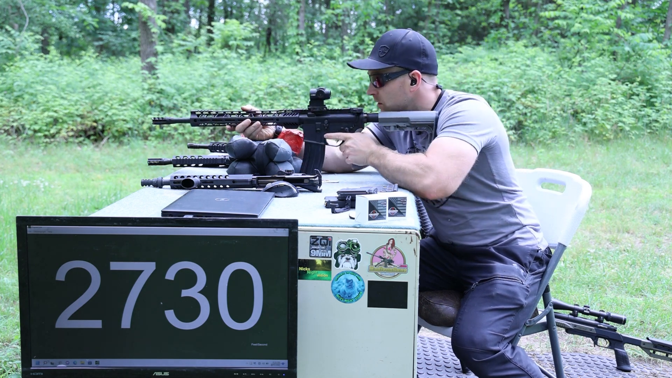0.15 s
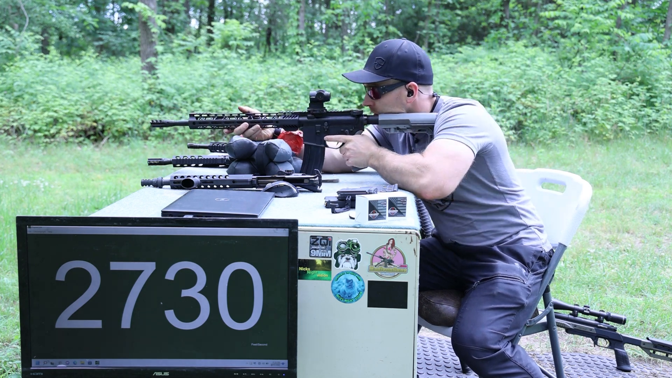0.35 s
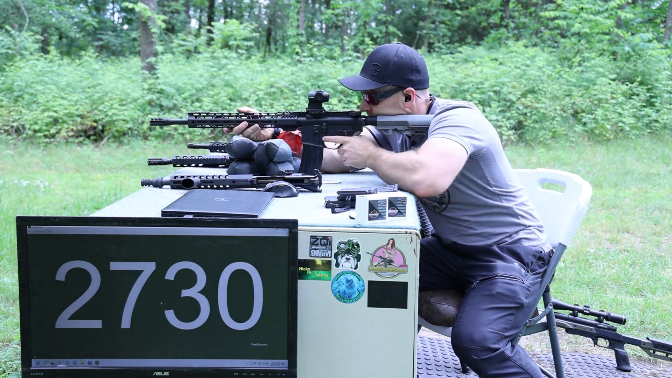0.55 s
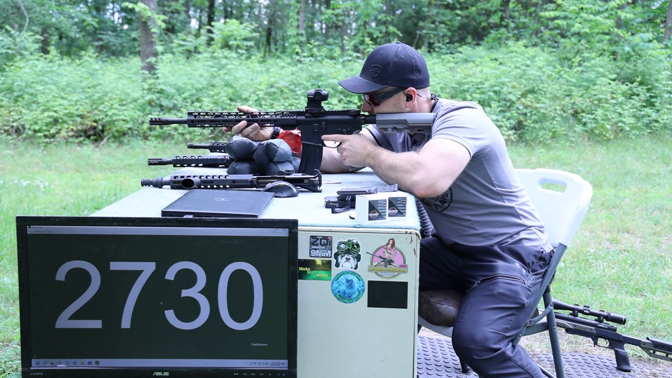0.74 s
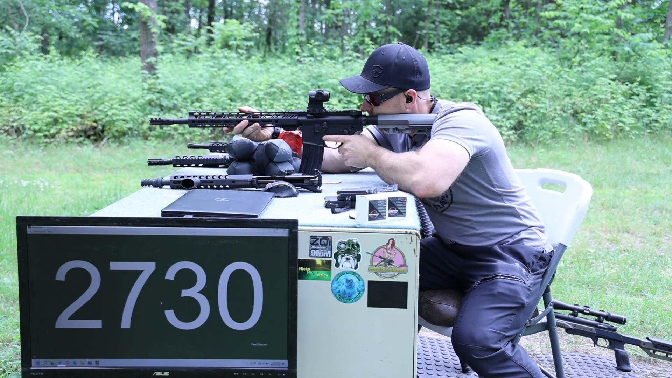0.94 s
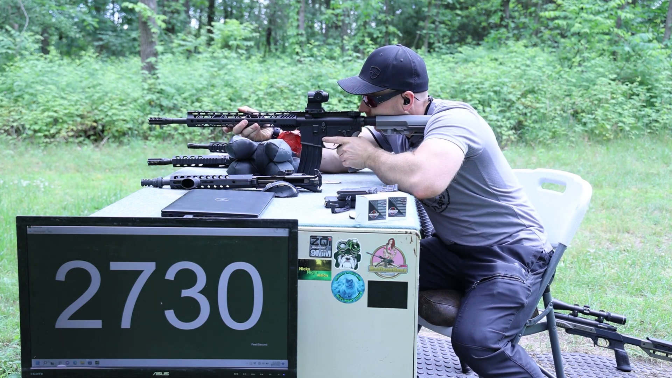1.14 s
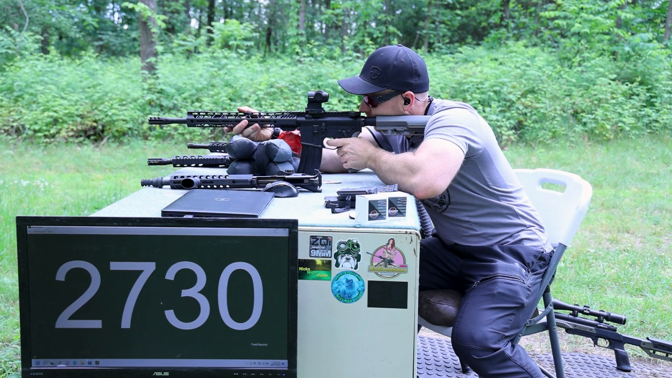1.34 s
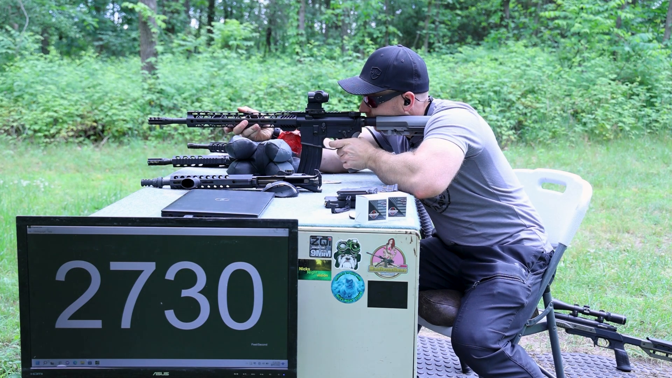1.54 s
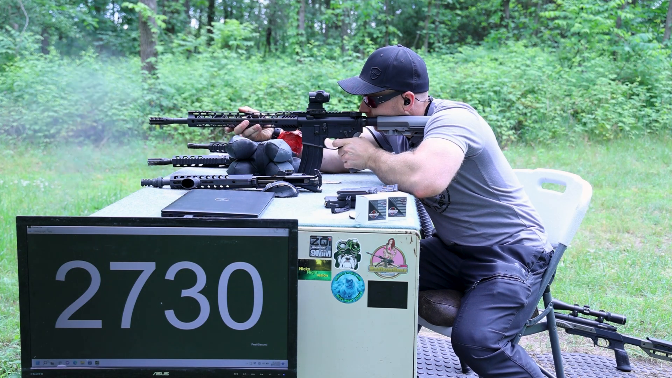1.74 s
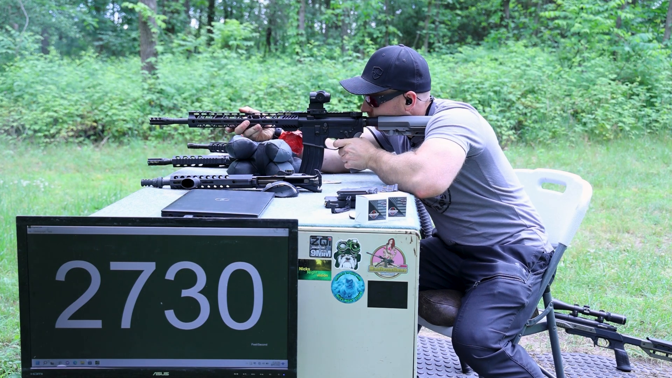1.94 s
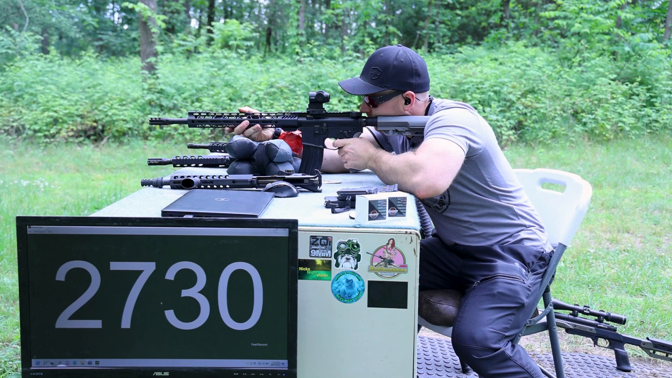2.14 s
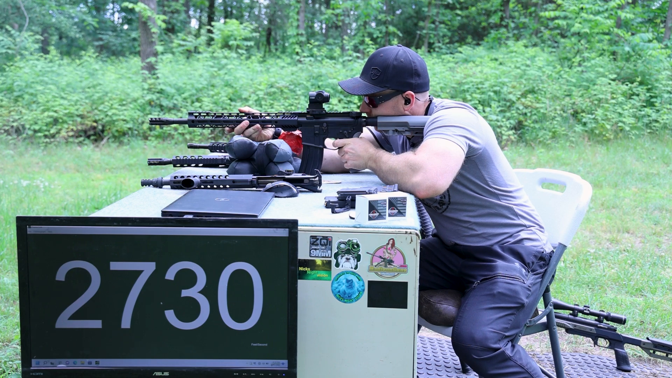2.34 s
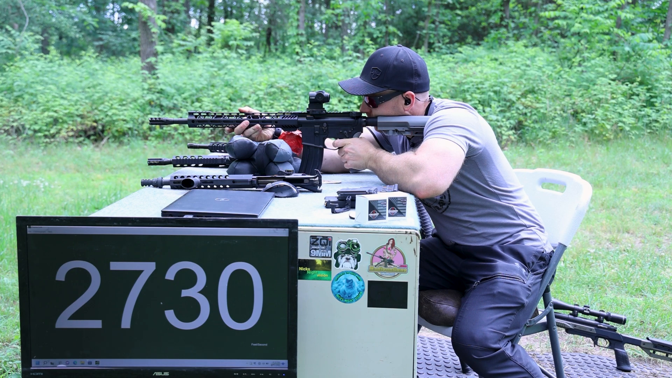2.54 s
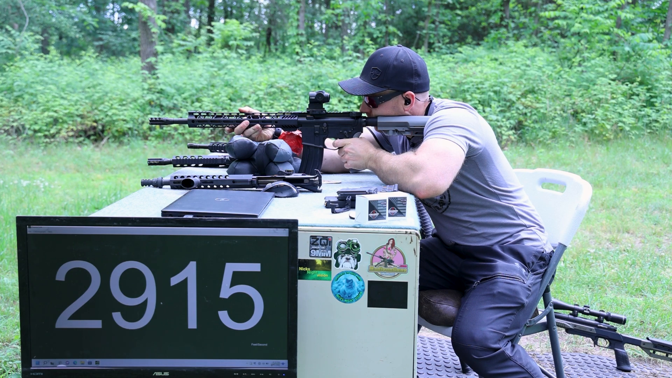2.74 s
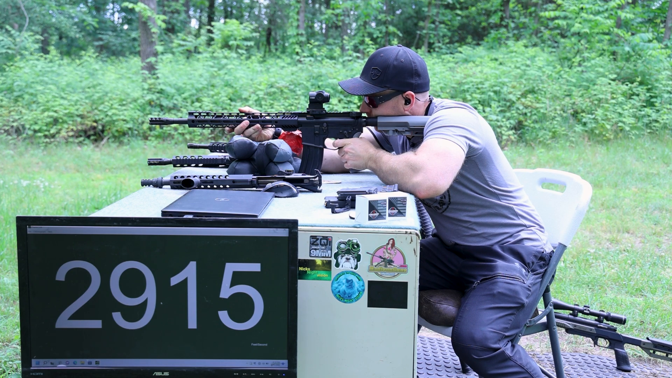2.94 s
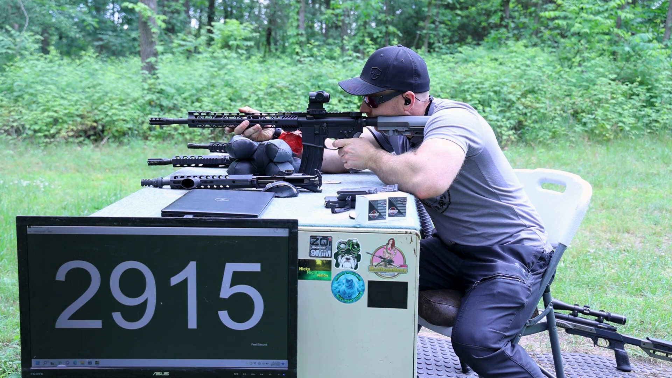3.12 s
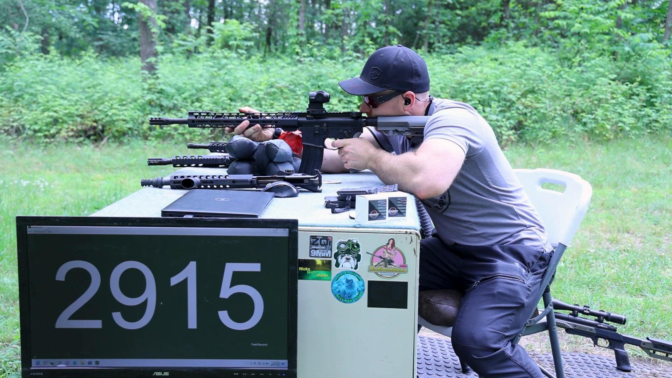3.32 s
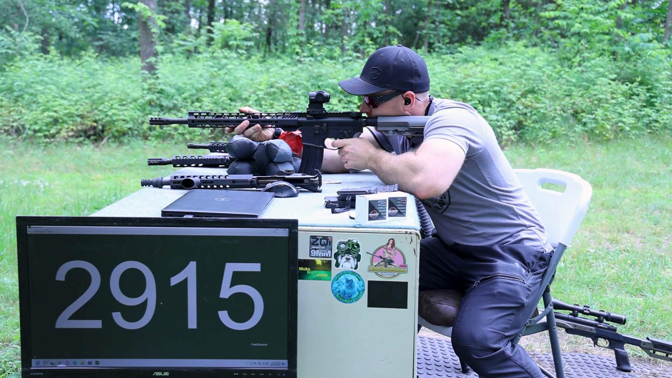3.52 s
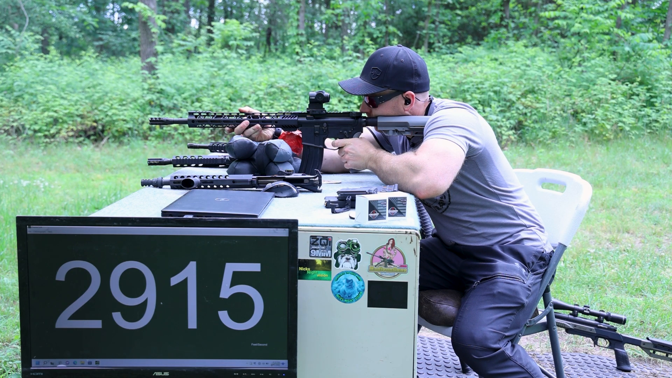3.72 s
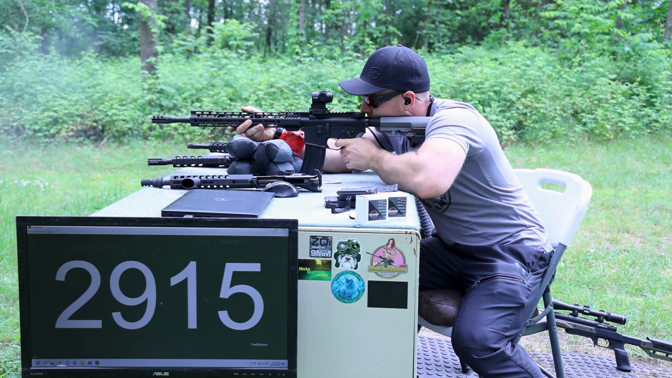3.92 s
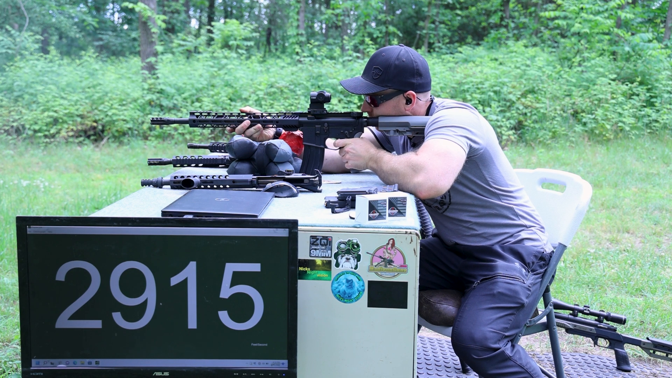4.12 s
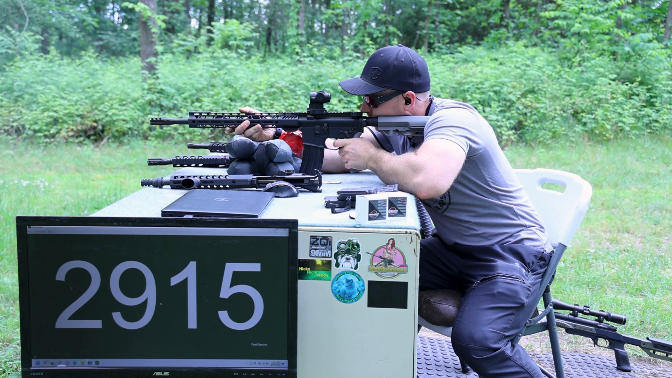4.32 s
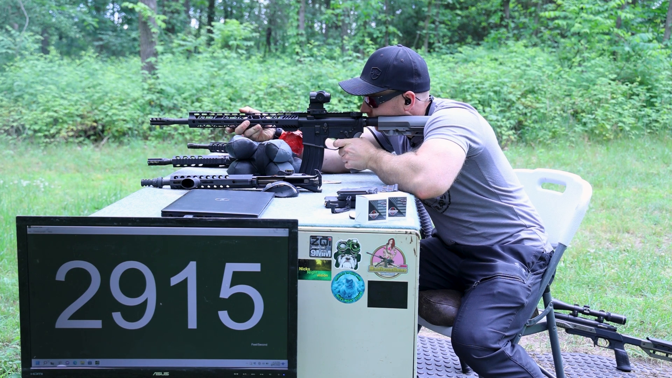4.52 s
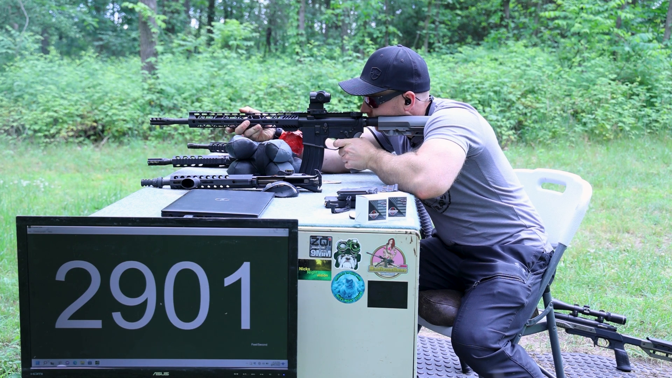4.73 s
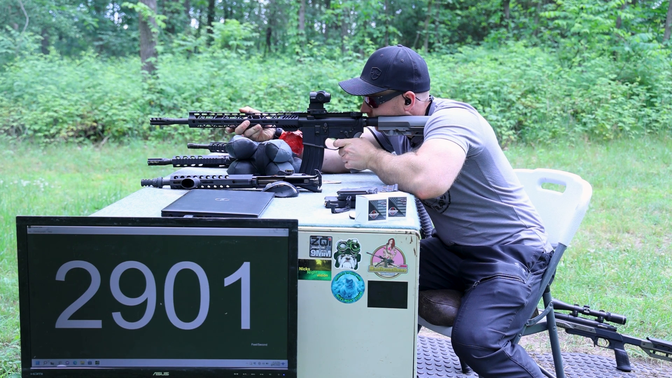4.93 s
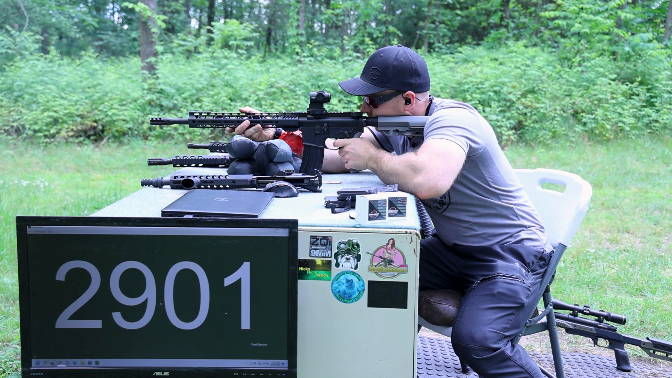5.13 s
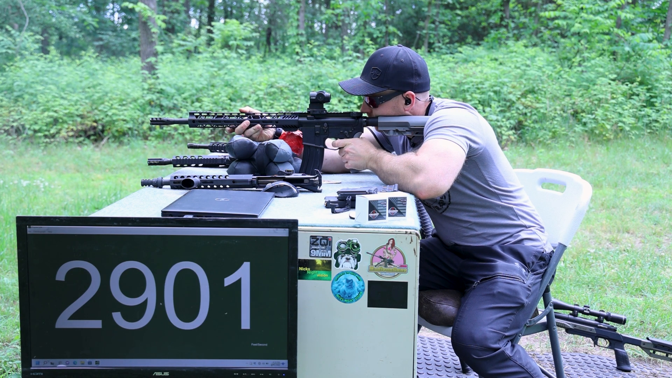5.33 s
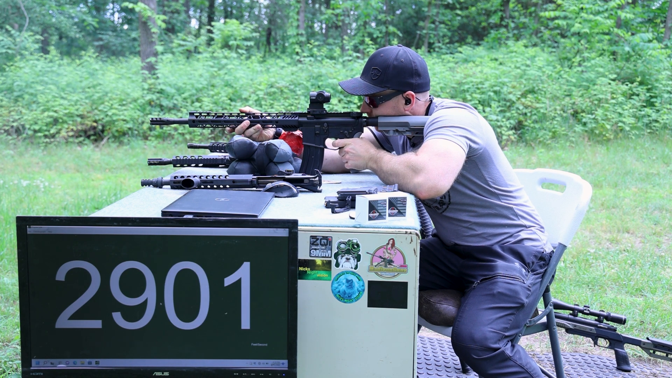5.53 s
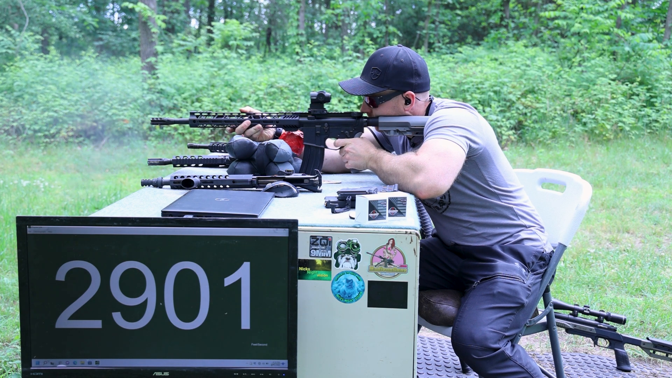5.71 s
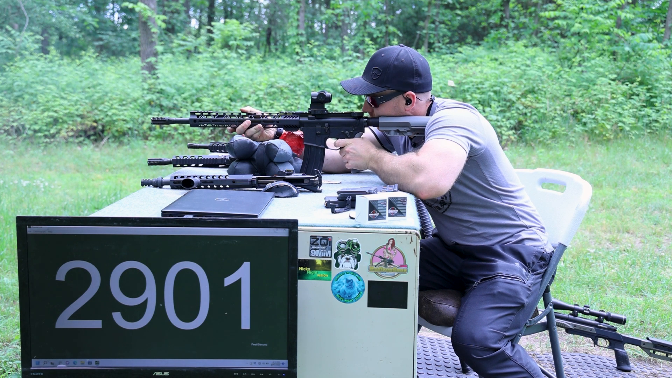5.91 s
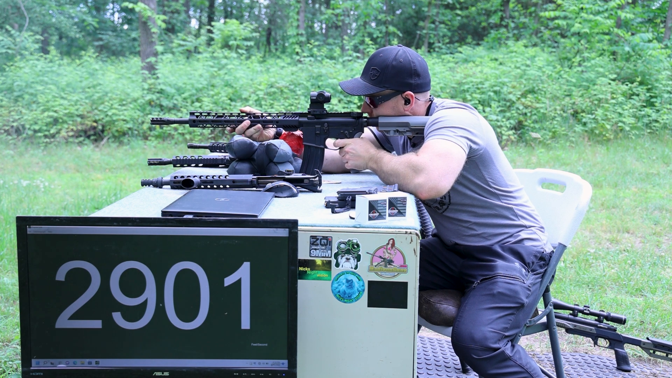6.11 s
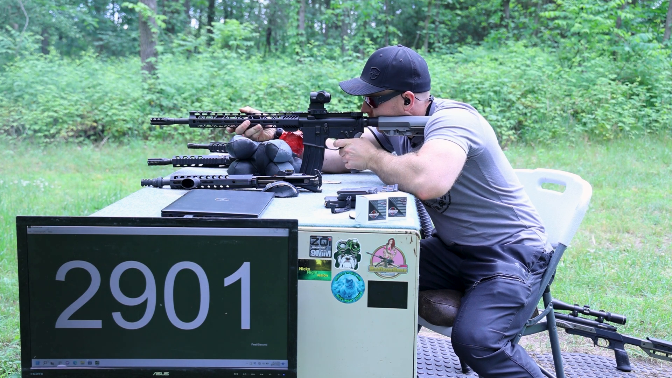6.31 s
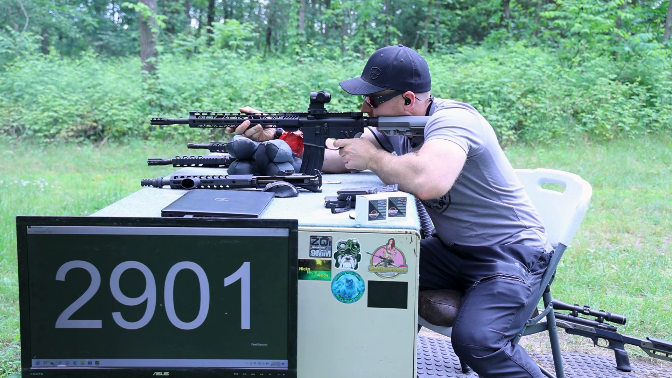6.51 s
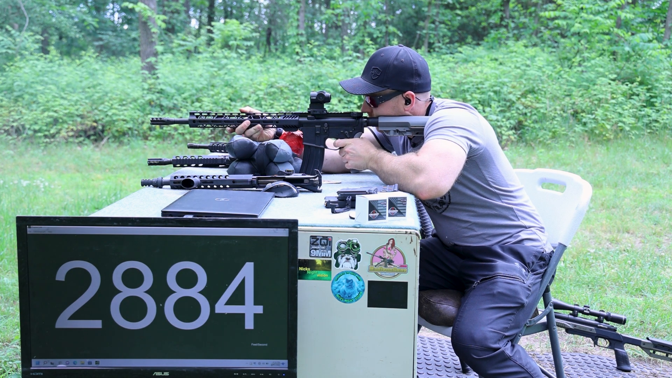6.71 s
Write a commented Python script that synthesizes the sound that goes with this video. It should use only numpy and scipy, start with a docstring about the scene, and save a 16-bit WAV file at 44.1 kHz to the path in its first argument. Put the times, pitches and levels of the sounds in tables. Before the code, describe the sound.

Soft knocks and cloth rustle as a rifle is settled on a rest, then three loud shots, each with a long forest echo.

```python
"""Faint outdoor air, cloth rustle and soft knocks are heard first, as a rifle is settled on its bench rest.
Three shots follow: shaped noise for blast and gas, steel blows of the action, a thin ring of the case.
One long, darkening forest echo, built from scattered noise and distinct returns, repeats with each blast.
Between the shots the trigger resets with a sharp click of steel noise and decaying sine tones.
The input stage flattens the peaks of the blasts."""
import sys
import numpy as np
from scipy import signal
from scipy.fft import irfft
from scipy.io import wavfile
from scipy.ndimage import map_coordinates

SR = 44100
rng = np.random.default_rng(int(sys.argv[2]) if len(sys.argv) > 2 else 0)


def output_pcm(signal):
    """Save a mono or channel-first signal as 16-bit PCM at the path in sys.argv[1].

    Samples are clipped to [-1, 1] before scaling.
    """
    pcm = np.clip(np.atleast_2d(signal).T, -1, 1) * 32767
    wavfile.write(sys.argv[1], SR, np.round(pcm).astype(np.int16))


N = 302526  # samples

# Colour tables hold spectrum points: freq_hz, density_db (per Hz); noise() sets the rms to 1.


def amp(db):
    """Amplitude factor of a level in dB."""
    return 10 ** (np.asarray(db) / 20)


def unit(x):
    """Scale to rms 1."""
    return x / np.sqrt(np.mean(x ** 2) + 1e-20)


def along(points, hz):
    """Interpolate (freq_hz, value) points on a log frequency axis."""
    f, v = np.transpose(points)
    return np.interp(np.log(hz + 1), np.log(f + 1), v)


def clock(size):
    """Seconds at each sample."""
    return np.arange(size) / SR


def noise(colour, size, low_hz=18):
    """Random-phase noise of rms 1 with a given spectrum, falling away below low_hz."""
    hz = np.fft.rfftfreq(size, 1 / SR)
    gain = amp(along(colour, hz)) * hz / np.hypot(hz, low_hz)
    phase = np.exp(2j * np.pi * rng.random(len(hz)))
    return unit(irfft(gain * phase, size))


def wobble(rate_hz, size):
    """Smooth random curve with rate_hz knots a second."""
    return map_coordinates(rng.standard_normal(size), [clock(size) * rate_hz], mode="mirror")


def strike(t, rise_s, t60_s):
    """Envelope that swells quickly and dies exponentially."""
    t = np.maximum(t, 0)
    rise = 1 - np.exp(-(t / rise_s) ** 2)
    return rise * np.exp(-np.log(1000) * t / t60_s)


def swell(t, centre_s, width_s):
    """Bell-shaped envelope; width_s is its standard deviation."""
    return np.exp(-.5 * ((t - centre_s) / width_s) ** 2)


def add(track, start_s, sound):
    """Mix a sound into the track, cut at the track's end."""
    part = track[max(round(start_s * SR), 0):][:len(sound)]
    part += sound[:len(part)]


# outdoor air colour: freq_hz, density_db
AIR_COLOUR = [(20, -11), (60, -3.5), (110, 2.5), (220, -3), (450, -5.5), (800, -19), (1400, -26),
              (3000, -34.5), (15000, -37)]


def clearing():
    """Faint, low outdoor air: noise with a slowly wandering level."""
    return amp(-74.5) * noise(AIR_COLOUR, N) * amp(0.72 * wobble(3, N))


# sleeve strokes along the stock: centre_s, level_db, width_s
STROKES = [(0.42, -59.5, .028), (0.745, -54, 0.028), (1.04, -68, .022)]
# bright cloth colour, also the edge of the knocks: freq_hz, density_db
CLOTH_COLOUR = [(470, -60), (800, -28), (896, -8), (1030, -9), (1480, -2), (2290, -11), (7170, -7.5),
                (16000, -11)]
# dull body-shuffle colour: freq_hz, density_db
SHUFFLE_COLOUR = [(150, -28), (250, 1), (318, -6), (580, -4), (707, -8.5), (1080, -4.5), (2340, -20.5),
                  (3000, -17), (3900, -35), (6600, -120)]
SETTLED_S, SETTLE_DB_PER_S = 1.24, 170  # the shifting dies away from here
RUSTLE_DB, SHUFFLE_DB = -76, -68.5
STROKE_SHUFFLE_DB = -22  # the body's dull share of a stroke


def settling():
    """Cloth rustles and slides over the stock in a few strokes until the shooter holds still."""
    t = clock(N)
    shifting = amp(-SETTLE_DB_PER_S * np.maximum(t - SETTLED_S, 0))
    strokes = sum(amp(level_db) * swell(t, centre_s, width_s) for centre_s, level_db, width_s in STROKES)

    rustle = amp(RUSTLE_DB + 1.2 * wobble(25.4, N)) * shifting
    swish = (rustle + strokes) * noise(CLOTH_COLOUR, N) * amp(1.2 * wobble(130.7, N))

    shuffle_env = amp(SHUFFLE_DB) * shifting + amp(STROKE_SHUFFLE_DB) * strokes
    shuffle = shuffle_env * noise(SHUFFLE_COLOUR, N) * amp(1.7 * wobble(20.5, N))

    # the stock presses softly into the shoulder just before the first shot
    press_colour = [(60, -4), (400, -4), (950, -4), (1400, -17), (3000, -32), (12000, -51)]
    press = amp(-54) * noise(press_colour, N) * swell(t, 1.583, 0.012)
    return swish + shuffle + press


# rifle knocks on the rest: start_s, level_db (before +1 dB), treble_db (before +5.5 dB), t60_s
KNOCKS = [(0.0793, -43.5, -13.5, 0.038), (0.238, -57, -24, .035), (0.392, -41.5, -22, 0.039),
          (0.5, -43, -26, 0.038), (0.575, -57, -8, .04), (0.812, -55.5, -22, 0.044),
          (0.963, -50.5, -18, 0.047), (1.018, -48.5, -19, .04), (1.041, -43, -26, 0.039),
          (1.103, -40.5, -27, 0.033), (1.195, -55.5, -10, .03), (1.285, -55.5, -8, 0.033)]
# knock body colour: freq_hz, density_db
REST_COLOUR = [(59, -27), (100, -1), (320, -13.5), (615, 1.5), (799, -3), (1150, -3.5), (1810, -20),
               (2820, -25), (3380, -26), (4460, -32), (5000, -34), (6500, -56), (11000, -120)]
# mean tones a bump draws from rifle and bench: pitch_hz, level_db, t60_s
BENCH_TONES = [(592, 0.5, 0.25), (780, -9, 0.17), (910, 6, 0.2), (1150, -2.5, 0.26), (1280, -6, 0.19),
               (1615, -16, .2), (2370, -21, .05)]
CONTACT_S = 0.0011  # rise of knock body and edge


def knocks():
    """The rifle bumps on its rest, at another spot each time; tones of bench and rifle ring briefly."""
    out, t = np.zeros(N), clock(SR // 2)
    for start_s, level_db, treble_db, t60_s in KNOCKS:
        body_env = strike(t, CONTACT_S, t60_s) + amp(-21) * strike(t, 0.0071, 0.3)
        body = noise(REST_COLOUR, len(t)) * body_env
        ring = np.zeros(len(t))
        for pitch_hz, tone_db, tone_t60_s in BENCH_TONES:
            # the spot struck varies level and pitch
            gain = amp(tone_db + rng.normal(0, 5.9))
            tone = np.sin(2 * np.pi * pitch_hz * rng.normal(1, 0.0232) * t)
            ring += gain * tone * strike(t, 0.0027, tone_t60_s)
        edge = amp(treble_db + 5.5) * noise(CLOTH_COLOUR, len(t)) * strike(t, CONTACT_S, 0.019)
        add(out, start_s, amp(level_db + 1) * (body + edge + amp(-19) * ring))
    return out


# clothing and gear ticks: start_s, level_db (before -4.5 dB)
TICKS = [(0.2384, -44), (0.61, -42), (0.624, -45), (0.635, -41), (1.0819, -47), (1.1009, -43), (1.37, -56),
         (1.4044, -50), (1.5633, -54)]


def ticks():
    """Clothing and gear give tiny bright ticks: very short noise bursts."""
    out, t = np.zeros(N), clock(SR // 2)
    colour = [(1500, -2), (5000, 3), (15000, 12.0)]
    for start_s, level_db in TICKS:
        tick = noise(colour, len(t)) * strike(t, 0.00022, 0.0075)
        add(out, start_s, amp(level_db - 4.5) * tick)
    return out


# muzzle blast colour: freq_hz, density_db
BLAST_COLOUR = [(30, -20.5), (120, -7), (300, -10.5), (480, 4), (750, -3), (1200, -6), (2000, -13.5),
                (4000, -32), (15000, -49)]
# gas puff colour: freq_hz, density_db
THUMP_COLOUR = [(20, -15), (60, -7.5), (130, -5.5), (260, 0), (380, -5.5), (700, -46)]


def muzzle(swing_hz=34):
    """The blast rattles between ground and bench; the expanding gas adds a low thump."""
    t = clock(SR // 2)
    blast_env = amp(6.0) * swell(t, 0.014, .0047) + amp(-6) * strike(t, 0.0014, 0.12)
    blast = noise(BLAST_COLOUR, len(t)) * blast_env
    crack_colour = [(300, -5), (1500, -0.5), (5000, -5.5), (15000, -16)]
    crack = amp(-14.5) * noise(crack_colour, len(t)) * strike(t, 0.00047, 0.009)
    # a turbulent low puff starts first and lasts longest; a quick push and slow low swing centre near 30 ms
    push = unit(np.gradient(swell(t, 0.029, 0.0014)))
    swing = np.cos(2 * np.pi * swing_hz * (t - .03)) * swell(t, 0.031, .021)
    puff = noise(THUMP_COLOUR, len(t)) * strike(t - .006, 0.0032, 0.23)
    return blast + crack - amp(-31.0) * push + amp(-19.5) * swing + amp(-7.5) * puff


# scattered echo colour at its start: freq_hz, density_db
FOREST_COLOUR = [(30, -51), (85, -21), (170, -12.5), (290, -10), (380, -3), (433, 3), (470, -1.5),
                 (510, 1.5), (600, -2), (780, -4.5), (1130, -9.5), (1900, -14.5), (3500, -16.5),
                 (6700, -17), (15000, -22.5)]
# extra loss in leaves and air: freq_hz, loss_db_per_s (the magnitude is used)
PATH_LOSS = [(100, 5.5), (450, 9.5), (800, -0.5), (1200, 2.5), (1900, 10), (3500, 22.5), (6700, 45.5),
             (11000, 79.5), (15000, 117.5)]
# distinct returns from the forest edge: delay_s, level_db, width_s
SLAPS = [(0.071, -12.5, .01), (0.125, -17.5, 0.013), (0.227, -22, 0.025), (0.325, -23, 0.0038),
         (0.342, -17, 0.005), (0.521, -28, 0.0034), (0.624, -39.5, 0.0097)]
# distant-woods roll colour: freq_hz, density_db
HILLS_COLOUR = [(60, -23.5), (130, -7), (300, -9.5), (500, 2.5), (750, 0.5), (1100, -4), (1500, -14.5),
                (2500, -30.5), (5000, -59)]


def forest(spread_db=90, depth_s=0.45, patchy_db=1.06, surge_db=0.34, rise_s=.011):
    """Echo of one blast: countless trunks scatter it, the later from farther away, fainter and duller."""
    t = clock(N)
    hz, delay_s, spectrum = signal.stft(noise(FOREST_COLOUR, N), SR, nperseg=512)
    path_gain = amp(-np.abs(along(PATH_LOSS, hz))[:, None] * delay_s)
    tail = signal.istft(spectrum * path_gain, SR)[1][:N]
    spread_gain = amp(-spread_db * np.log10(1 + t / depth_s))
    tail = tail * spread_gain * (1 - np.exp(-(t / rise_s) ** 2))

    # leaves scatter the treble evenly; groups of trunks return the low part in surges
    trunks = signal.sosfiltfilt(signal.butter(2, 1500, fs=SR, output="sos"), tail)
    leaves = tail - trunks
    trunks_gain = amp(patchy_db * wobble(80, N) + surge_db * wobble(25, N))

    edge_colour = [(200, -28.0), (450, 11), (750, 8.5), (1300, -23.5), (4000, -33), (10000, -57.0)]
    slap_env = sum(amp(level_db) * swell(t, slap_s, width_s) for slap_s, level_db, width_s in SLAPS)
    slaps = slap_env * noise(edge_colour, N)

    # a bright hiss swells briefly about 0.19 s after each blast
    treble_hiss_colour = [(2000, -30.5), (7000, -3), (12000, 1), (16000, -7)]
    treble_hiss = amp(-35) * noise(treble_hiss_colour, N) * swell(t, .19, .024)

    # a dull roll comes back from the distant woods
    roll = amp(-41.5) * noise(HILLS_COLOUR, N) * strike(t, 0.99, 4.75) * amp(0.75 * wobble(41, N))
    return amp(-2.5) * leaves + amp(-1.06) * trunks * trunks_gain + slaps + treble_hiss + roll


# shots: start_s, level_db, case_ring_db (not scaled by level_db)
SHOTS = [(1.8273, -1.5, -48), (3.987, -1.5, -31.5), (5.8015, -1.5, -30)]
# steel blows of the action, added to the shot level: delay_s, level_db, t60_s
ACTION = [(-.0075, -22.5, 0.037), (0.0235, -16, .11), (0.059, -3.5, .06)]
# steel colour, also used by the resets: freq_hz, density_db
STEEL_COLOUR = [(200, -19.5), (1000, 7.5), (2500, 3.5), (4200, -2.5), (6200, 5), (9500, -8.5),
                (16000, -12.5)]


def shots():
    """Rifle and trees stay in place, so blast and echo repeat; the clatter of the action is new each time."""
    out, t = np.zeros(N), clock(SR // 2)
    report = forest()
    add(report, 0, muzzle())
    brass_colour = [(9000, -60.0), (11500, -17), (12300, -8.0), (12650, -1), (13000, -6.0), (15000, -24.0)]
    for start_s, level_db, case_ring_db in SHOTS:
        add(out, start_s, amp(level_db) * report)
        for delay_s, blow_db, t60_s in ACTION:
            blow = noise(STEEL_COLOUR, len(t)) * strike(t, 0.0002, t60_s)
            add(out, start_s + delay_s, amp(level_db + blow_db) * blow)
        # the ejected case rings thinly as it spins away
        brass = noise(brass_colour, len(t)) * swell(t, 0.1, 0.049)
        add(out, start_s, amp(case_ring_db) * brass)
    return out


# trigger resets: start_s, level_db, steel_db, ring_db (the last two relative to level_db)
RESETS = [(3.2822, -17, -1, -11), (5.2672, -14.5, -3, -14.5)]
# body colour of the first reset: freq_hz, density_db
FIRST_RESET_COLOUR = [(88, -48), (150, -20), (391, -4.5), (905, -11.5), (1190, -2), (1390, -20), (1720, -7),
                      (2360, -26), (3550, -20), (4160, -13.5), (5460, -25), (6770, -12), (7620, -28),
                      (14000, -29), (16000, -41)]
# body colour of the second reset: freq_hz, density_db
SECOND_RESET_COLOUR = [(88, -33), (150, -8), (1170, 1), (1340, 2), (1480, 0.5), (2020, 3), (2700, -34),
                       (4240, 4.5), (4580, -22), (6910, -12), (7920, -40), (8730, -9), (9630, -31),
                       (12200, -17), (16000, -32)]
# receiver and trigger-group tones: pitch_hz, level_db, t60_s
RECEIVER_TONES = [(950, -29, 0.24), (1098, 5, 0.046), (1074, -32.5, 1), (1180, -7, 0.025),
                  (1680, -11, 0.058), (2135, -3, 0.047), (2780, -29.5, 0.18), (4200, -13, 0.031),
                  (4400, -39, 0.29), (6300, -10, 0.021)]


def resets():
    """The disconnector lets go and the hammer snaps onto the sear; the receiver rings and the bench answers."""
    out, t = np.zeros(N), clock(SR // 2)
    snap_t, knock_t = t - .0022, t - .0033
    body_env = amp(-14.5) * strike(t, 0.0007, 0.025) + strike(knock_t, 0.00049, 0.023)
    answer_colour = [(200, -8), (950, 2.5), (1600, -15), (3000, -15), (7000, -21), (15000, -35)]
    body_colours = (FIRST_RESET_COLOUR, SECOND_RESET_COLOUR)
    for (start_s, level_db, steel_db, ring_db), body_colour in zip(RESETS, body_colours):
        steel = amp(steel_db) * noise(STEEL_COLOUR, len(t)) * strike(snap_t, 0.00045, 0.018)
        ring = np.zeros(len(t))
        for pitch_hz, tone_db, t60_s in RECEIVER_TONES:
            tone = np.sin(2 * np.pi * (pitch_hz * t + rng.random()))
            ring += amp(tone_db) * tone * strike(knock_t, 0.0027, t60_s)
        answer = noise(answer_colour, len(t)) * strike(knock_t, 0.006, 0.14)
        body = body_env * noise(body_colour, len(t))
        click = steel + body + amp(ring_db) * ring + amp(-21.0) * answer
        add(out, start_s, amp(level_db) * click)
    return out


def scene():
    """Sum of all layers, as one channel."""
    return (shots() + resets() + knocks() + ticks() + settling() + clearing())[None]


TOP_HZ = 15900  # band limit


def record(dry, ceiling=0.7, hardness=7):
    """The input stage flattens the blast's peaks; a steep low-pass then limits the band."""
    clipped = dry / (1 + np.abs(dry / ceiling) ** hardness) ** (1 / hardness)
    band_limit = signal.cheby1(12, .05, TOP_HZ, fs=SR, output="sos")
    return signal.sosfiltfilt(band_limit, clipped)


dry = scene()
out = record(dry)
output_pcm(out)
```